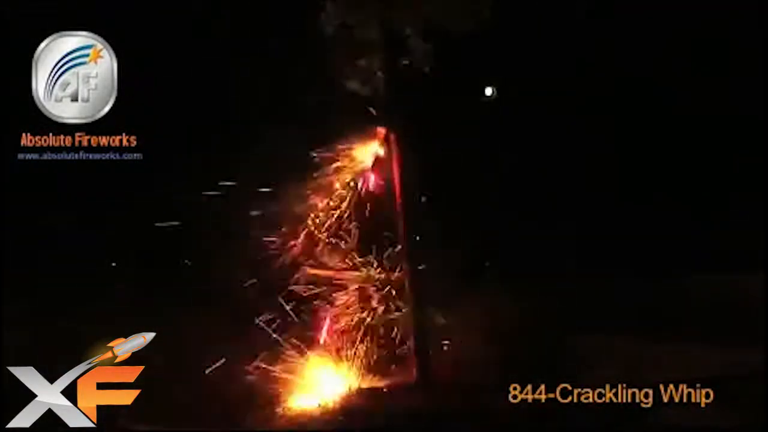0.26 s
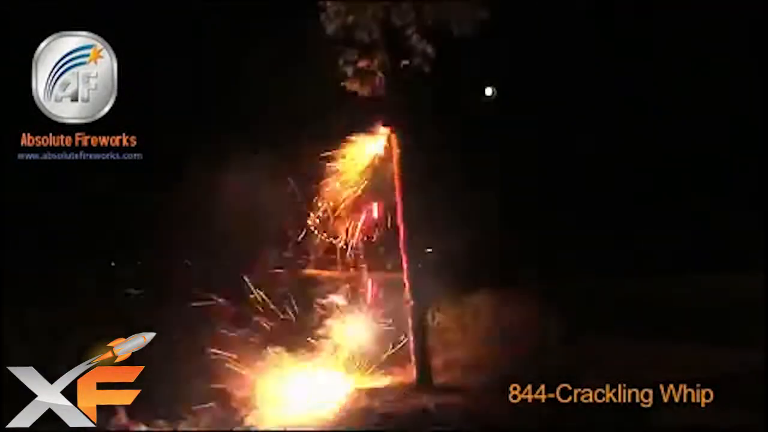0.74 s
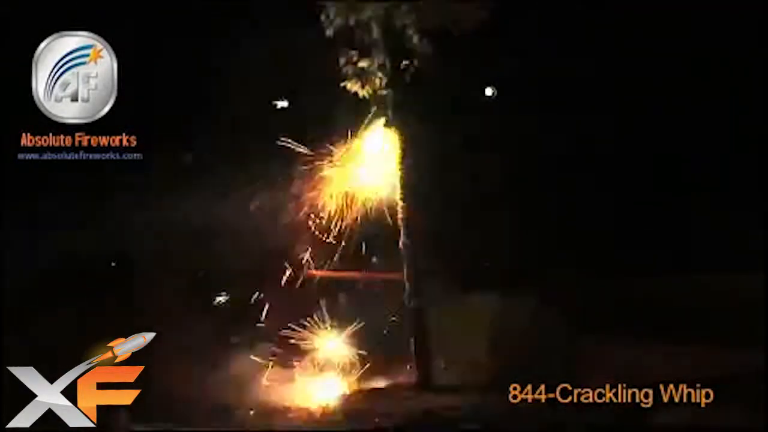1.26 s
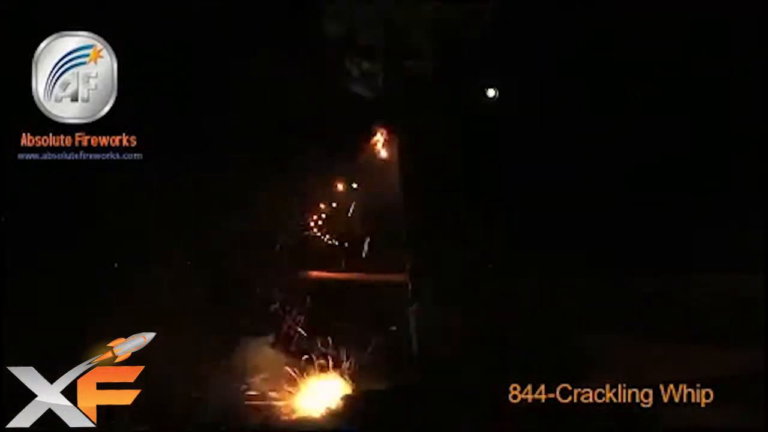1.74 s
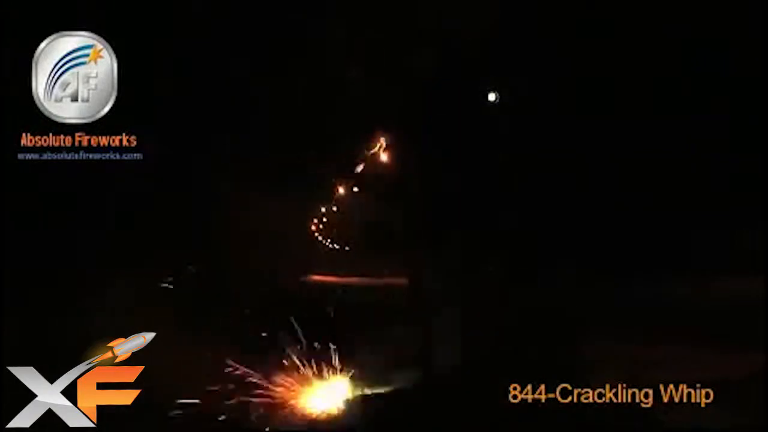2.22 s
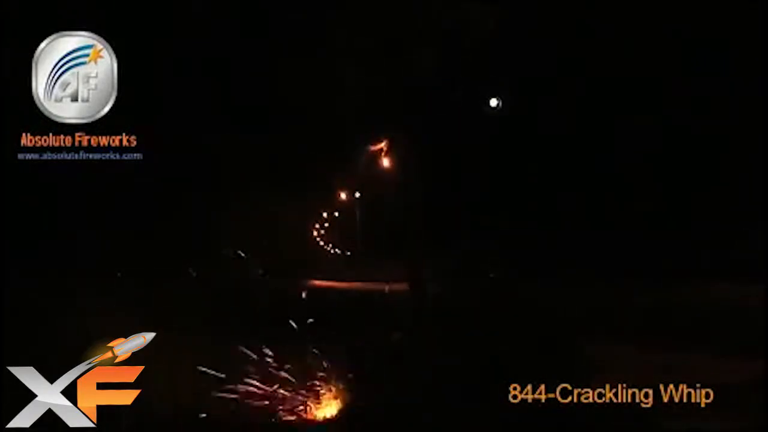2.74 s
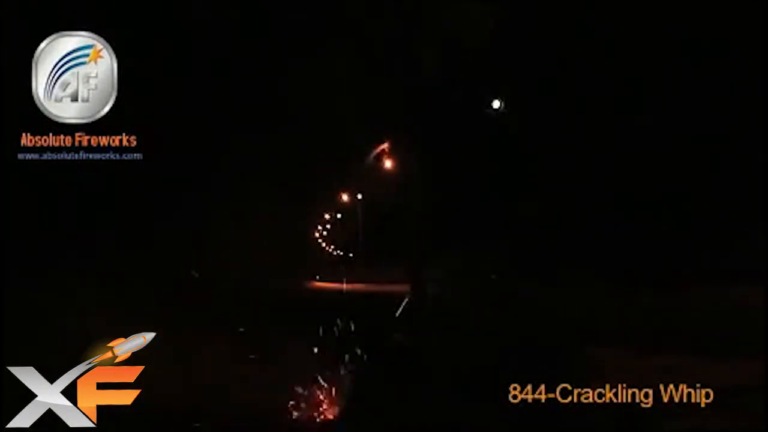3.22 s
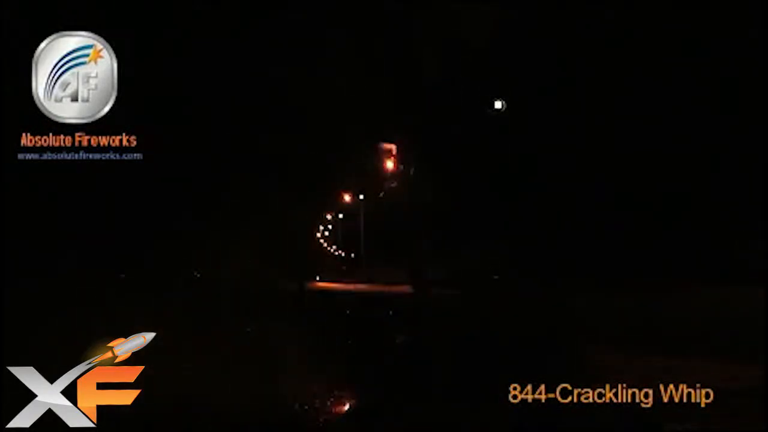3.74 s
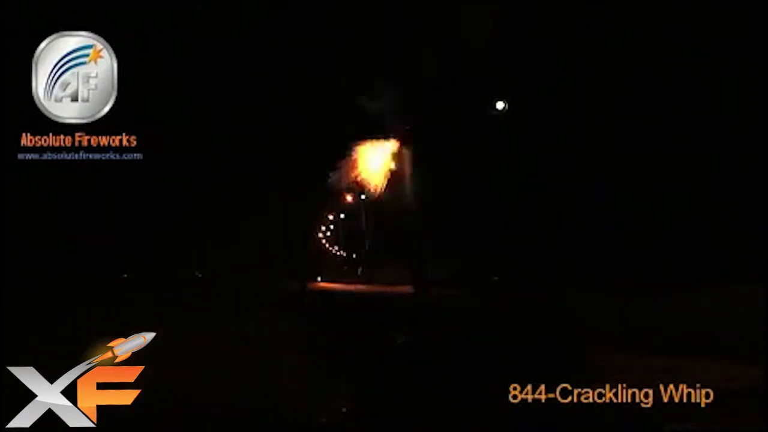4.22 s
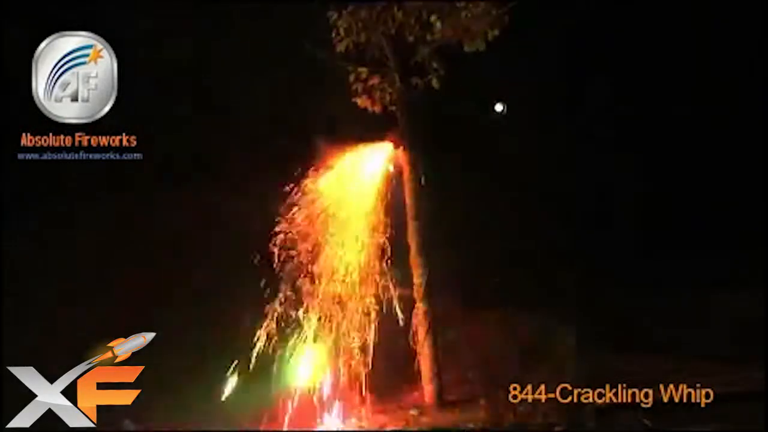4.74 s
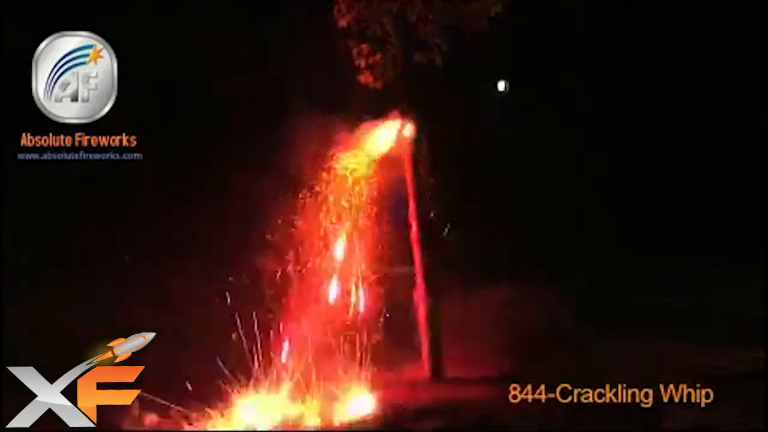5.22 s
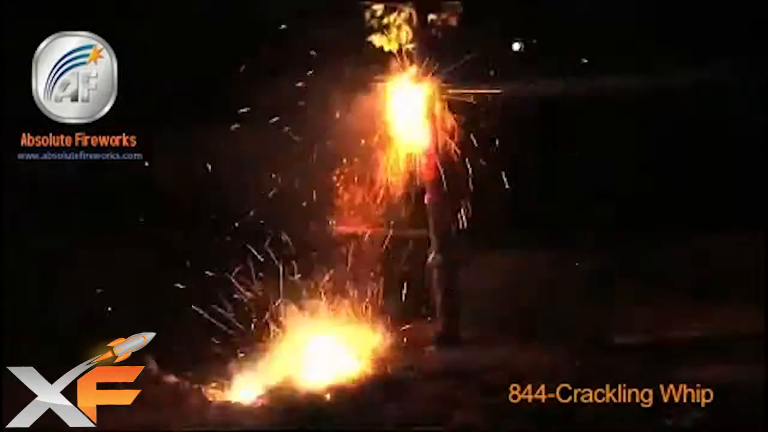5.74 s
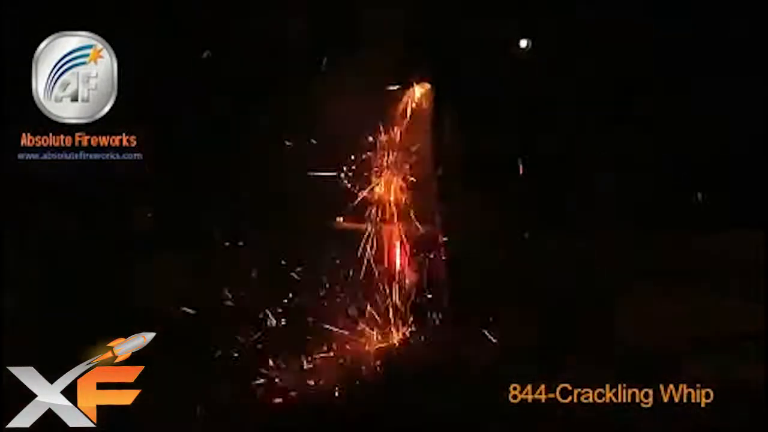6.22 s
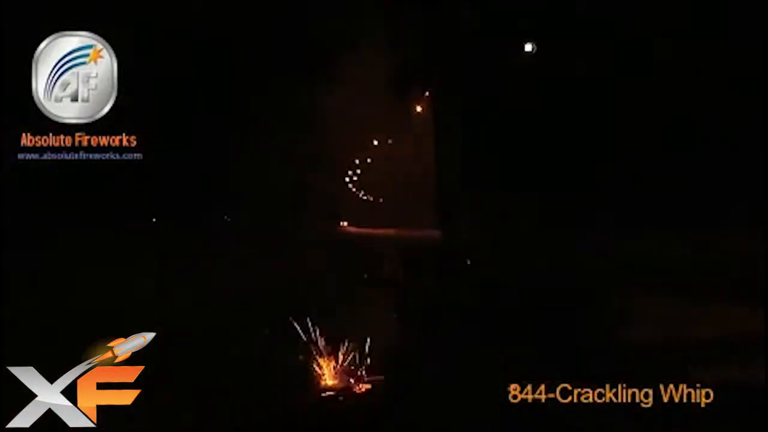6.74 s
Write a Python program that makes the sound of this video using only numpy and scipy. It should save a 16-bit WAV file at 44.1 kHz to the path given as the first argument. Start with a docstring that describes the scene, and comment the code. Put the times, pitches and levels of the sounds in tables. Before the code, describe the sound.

Sharp, uneven bangs and pops from burning pellets come many per second, each with a ground slap, scattered close reflections and a diffuse tail from nearby walls. They become sparse, then stop. After a quiet gap comes a brief bright fizz and a rushing gas jet, followed by a frantic crackling volley with sizzling sparks and low rumble, ending in a few last snaps. Open street, fairly near microphone.

```python
"""A crackling firework hangs from a tree at night; its pellets burst in the air and on the pavement.
Each crack is a short pressure pulse with a ground bounce and a cluster of noisy near reflections.
Tiny sparks fizz, the street answers with shaped noise, and a low rumble swells over a faint outdoor hush.
The crackle thins out, a fuse fizzes, and a fresh charge catches with puffs and a hiss of filtered noise.
A last dense volley then dies away."""
import sys
import numpy as np
from scipy import signal
from scipy.fft import rfft, irfft, next_fast_len
from scipy.io import wavfile
from scipy.ndimage import map_coordinates

SR = 44100
rng = np.random.default_rng(int(sys.argv[2]) if len(sys.argv) > 2 else 0)


def master(y):
    """Save y as 16-bit WAV."""
    cut = np.clip(np.atleast_2d(y).T, -1, 1)
    pcm = np.round(cut * 32767)  # scale
    wavfile.write(sys.argv[1], SR, pcm.astype(np.int16))


N = 307818
TOP_HZ = 10380
WINDOW = 4096  # samples that hold one crack and its near reflections


def amp(db):
    """Turn decibels into a plain gain."""
    return 10 ** (np.asarray(db) / 20)


def unit(x):
    """Scale a sound to an rms of 1."""
    return x / np.sqrt(np.mean(x ** 2) + 1e-20)


def colour(points, hz):
    """Gain at each frequency, drawn through (Hz, dB) points on a log axis."""
    point_hz, point_db = np.transpose(points)
    return amp(np.interp(np.log(hz + 1), np.log(point_hz), point_db))


def curve(rows):
    """Gain per sample through (s, dB) rows, fading out fast beyond their ends."""
    row_s, row_db = np.transpose(rows)
    t = np.arange(N) / SR
    outside_s = np.abs(t - np.clip(t, row_s[0], row_s[-1]))
    return amp(np.interp(t, row_s, row_db) - 670 * outside_s)


def wobble(rate):
    """A smooth random curve with rate knots a second."""
    knots = rng.standard_normal(int(N * rate / SR) + 4)
    return map_coordinates(knots, [np.arange(N) * rate / SR])


def filtered(x, response):
    """Filter x by a complex response of frequency."""
    size = next_fast_len(N + SR // 2)  # spare room so that nothing wraps round
    return irfft(rfft(x, size) * response(np.fft.rfftfreq(size, 1 / SR)), size)[..., :N]


def band(hz):
    return 1 / np.sqrt(1 + (hz / TOP_HZ) ** 160)


def rush(response, width):
    """Coloured stereo noise of rms 1; width is the side over the mid signal."""
    mid, side = filtered(rng.standard_normal((2, N)), lambda hz: response(hz) * band(hz))
    return unit(np.array([mid + width * side, mid - width * side]))


def delay(hz, seconds):
    """A pure time delay, as a response of frequency."""
    return np.exp(-2j * np.pi * hz * seconds)


def blast(hz, pitch_hz, turn_hz=3300):
    """One pressure spike and its suction; the microphone's phase lag folds it into an N shape."""
    s = 1j * hz / pitch_hz
    pulse = s / (1 + s) ** 2
    phase_lag = (turn_hz - 1j * hz) / (turn_hz + 1j * hz)
    return pulse * phase_lag * band(hz)


# level of the swarm of tiny sparks over time: start_s, level_db
SPARK_LEVELS = [(0, -33.5), (.5, -53), (2.2, -38), (2.45, -64), (5.12, -59), (5.29, -30), (5.62, -27),
                (5.97, -29.5), (6.25, -40), (6.5, -93)]


def sparks(rate_per_s=350, pitch_hz=2300, size_spread_db=4):
    """Countless tiny bursts of uneven size over the wash of their own reflections."""
    sizes = (rng.random(N) < rate_per_s / SR) * amp(size_spread_db * np.clip(rng.standard_normal(N), -2, 2))
    left_right = sizes * amp(2 * rng.standard_normal((2, N)))
    ticks = unit(filtered(left_right, lambda hz: blast(hz, pitch_hz) * colour(CRACK_TONE, hz)))
    wash = rush(lambda hz: np.abs(blast(hz, pitch_hz)) * colour(REFLECTION_TONE, hz), width=0.92)
    wash *= amp(1.1 * wobble(37))
    return curve(SPARK_LEVELS) * unit(ticks + wash)


# level of the low rumble, strongest while the flames are high: start_s, level_db
RUMBLE_LEVELS = [(0, -54), (2.6, -59), (3.8, -70), (4.27, -54), (4.6, -73), (5.7, -45), (6.6, -68)]


def flame_rumble(swing_db=3.5):
    """An uneven low rumble of the flames, made from deep noise."""
    rumble = rush(lambda hz: 1 / (1 + (hz / 140) ** 3), width=0.66)
    return curve(RUMBLE_LEVELS) * amp(swing_db * wobble(12)) * rumble


# tone of the outdoor hush: pitch_hz, relative_db
HUSH_TONE = [(90, 0.5), (250, -12), (2500, -30), (10000, -11.5)]


def night_hush(hush_db=-64):
    """A faint, steady outdoor hush of noise."""
    return amp(hush_db) * rush(lambda hz: colour(HUSH_TONE, hz), width=0.94)


def ripple(depth_db, grain_hz):
    """A causal filter with random humps and notches about grain_hz apart."""
    hz = np.fft.rfftfreq(WINDOW, 1 / SR)
    db = depth_db * map_coordinates(rng.standard_normal(WINDOW // 8), [hz / grain_hz], mode="mirror")
    # folding the cepstrum forward in time keeps the response from starting early
    cepstrum = irfft(np.log(amp(db)))
    return np.exp(rfft(cepstrum * 2 * (np.arange(WINDOW) < WINDOW // 2)))


def bass_lag(hz, corner_hz=190, damping=1.0):
    """The microphone's low resonance lets the thump trail the crack by a few milliseconds."""
    s = 1j * hz / corner_hz
    return (1 - damping * s + s ** 2) / (1 + damping * s + s ** 2)


# near reflections: dB against the crack at the reference pitch, and dB more for each octave brighter
SCATTER_DB, SCATTER_DB_PER_OCTAVE, SCATTER_REFERENCE_HZ = -14.5, 2.5, 1460


def scattered_db(db, pitch_hz):
    """Bright bursts in the air scatter more than dull ones on the pavement."""
    return db + SCATTER_DB + SCATTER_DB_PER_OCTAVE * np.log2(pitch_hz / SCATTER_REFERENCE_HZ)


# tone of the crack itself: pitch_hz, relative_db
CRACK_TONE = [(50, 5.5), (260, 5), (500, 1.5), (800, 0.5), (1500, 2), (4000, -1.5), (10000, -6)]


def direct_crack(hz, lead, db, pitch_hz, front=7.6):
    """A burst shell sends out a pressure pulse, followed by its reflection from the ground."""
    # no two shells tear open alike, so each has its own colour
    shell = ripple(depth_db=3, grain_hz=650) * bass_lag(hz) * delay(hz, lead / SR)
    # a slow, deep burst also has a softer pressure front
    wave = blast(hz, pitch_hz) * shell / (1 + 1j * hz / (front * pitch_hz))
    # the bounce lags by the height of the burst and is stronger on the right
    bounce = np.array([[0.225], [0.54]])
    ground = bounce * delay(hz, rng.uniform(0.000868, 0.00249)) / (1 + 1j * hz / 5000)
    direct = irfft(wave * colour(CRACK_TONE, hz) * (1 - ground))
    # equal energy to a steady sound of this level lasting 2.1 ms
    direct *= amp(db) * np.sqrt(0.0021 * SR / np.sum(direct.mean(0) ** 2))
    # a small random tilt between left and right, in dB
    return direct * amp(rng.normal(0, 0.23) * np.array([[1], [-1]]))


# tone of the near reflections: pitch_hz, relative_db
REFLECTION_TONE = [(120, 1), (290, 18), (700, 5.5), (2500, 1.5), (10000, 4.5)]


def near_reflections(hz, lead, db, pitch_hz, lumpy_db=3, spread_s=0.015, width=0.57, wide_hz=4500,
                     scatter_hz=1900, memory=0.48):
    """Things nearby return a dense cluster of echoes, made from noise that swells and dies."""
    t = np.arange(WINDOW) / SR
    cluster = np.sqrt((1 - np.exp(-t / 0.00067)) / (1 + (t / spread_s) ** 5))
    # reflections of uneven strength
    knots_s = t[::WINDOW // 128]
    lumps = amp(lumpy_db * np.interp(t, knots_s, rng.standard_normal(len(knots_s))))
    # a few hard surfaces return separate snaps, about 300 a second
    snaps = 1 + 4 * (rng.random(WINDOW) < 300 / SR)
    mid, side = rfft(rng.standard_normal((2, WINDOW)) * cluster * lumps * snaps)
    # the two sides agree less in the treble
    side = side * width * (0.7 + hz / (hz + wide_hz))
    # they mix what left the burst in all directions, and keep only part of its pitch
    mixed_hz = scatter_hz * (pitch_hz / scatter_hz) ** memory
    mixed = blast(hz, mixed_hz) * delay(hz, lead / SR) * colour(REFLECTION_TONE, hz)
    paths = ripple(depth_db=2.8, grain_hz=170)
    near = irfft(np.array([mid + side, mid - side]) * mixed * paths)
    loudness = np.sqrt(np.sum(cluster ** 2) / np.sum(near.mean(0) ** 2))
    return near * amp(scattered_db(db, pitch_hz)) * loudness


# single bursts, loud and faint, and one low thump: start_s, level_db, pitch_hz
SINGLE_BURSTS = [(0.0774, -16.5, 2600), (0.1494, -15.5, 2800), (0.2129, -14, 1850), (0.2353, -18.5, 1790),
                 (0.2619, -18, 2150), (0.2987, -14.5, 1420), (0.3259, -16.5, 920), (0.4147, -15, 1030),
                 (0.433, -18.5, 1900), (0.4775, -18, 1700), (0.5251, -16.5, 694), (0.5521, -18, 2110),
                 (0.5765, -17, 1360), (0.6202, -17, 1440), (0.6418, -17.5, 1370), (0.6638, -19.5, 2300),
                 (0.7039, -16.5, 3040), (0.7453, -15.0, 2010), (0.776, -19, 2810), (0.7933, -12, 1020),
                 (0.8324, -14.5, 1270), (0.9309, -20, 1240), (0.9456, -17.5, 980), (0.9979, -15, 1140),
                 (1.0194, -14.5, 1470), (1.05, -13.5, 1020), (1.1065, -15.5, 1610), (1.1394, -17.5, 2460),
                 (1.1717, -13.5, 1050), (1.2134, -16.5, 1070), (1.2527, -19, 880), (1.323, -13, 1350),
                 (1.342, -18.5, 2100), (1.381, -14, 1700), (1.4138, -14.5, 1520), (1.4708, -17.5, 1610),
                 (1.486, -13.5, 1520), (1.5359, -18, 1560), (1.5622, -17, 980), (1.5912, -13, 1190),
                 (1.6657, -18.0, 1530), (1.68, -14, 1200), (1.71, -18.5, 910), (1.7675, -18, 990),
                 (1.8096, -14.5, 1280), (1.8447, -18, 930), (1.8638, -13.5, 1000), (1.9117, -17, 1160),
                 (1.9643, -15, 2730), (2.0261, -14.0, 1500), (2.0435, -14.5, 1220), (2.1282, -17, 1060),
                 (2.1741, -13.5, 1480), (2.2057, -18, 990), (2.261, -20.5, 1120), (2.2749, -16, 1270),
                 (2.3148, -25, 1110), (2.468, -24, 915), (2.5044, -11, 1510), (2.5586, -17, 1270),
                 (2.6002, -13, 780), (2.6287, -17.5, 1030), (2.6997, -22, 800), (2.7329, -17.5, 860),
                 (2.7675, -16, 1250), (2.8687, -17.5, 1260), (2.888, -17, 2200), (2.9315, -12.5, 1520),
                 (2.968, -12.5, 1370), (3.005, -13.5, 1290), (3.2139, -13.5, 1250), (3.2444, -19.5, 795),
                 (3.582, -12.5, 1683), (3.6391, -13.5, 1740), (4.2524, -33.5, 520), (5.0099, -32.5, 2130),
                 (5.1668, -14, 1520), (5.2057, -15.5, 1680), (5.2361, -18.5, 1920), (5.2913, -15.5, 2390),
                 (5.3351, -16.5, 1410), (5.3472, -11.5, 1860), (5.3855, -16.5, 1460), (5.4624, -15, 990),
                 (5.5165, -15.5, 1650), (5.5567, -14.5, 2690), (5.5911, -15, 2400), (5.6639, -20.5, 2000),
                 (5.7024, -14.5, 1720), (5.739, -13, 2250), (5.8366, -19.5, 1950), (5.907, -17, 2140),
                 (5.925, -13.5, 1290), (5.9401, -15.5, 1270), (5.9626, -14, 1650), (6.0986, -11.5, 1680),
                 (6.1096, -14.5, 1680), (6.1372, -15, 980), (6.1862, -13.5, 1330), (6.2093, -16, 1180),
                 (6.2592, -15, 1790), (6.3577, -16, 2050), (6.4015, -14, 1190), (6.4376, -24.5, 810),
                 (6.467, -32.5, 466), (6.587, -12.5, 1410), (6.6562, -32, 690), (6.753, -27.5, 3800),
                 (6.7903, -21.5, 3000)]


def cracks(rows):
    """Each burst gives a blast, a ground bounce and its own cluster of near reflections."""
    out = np.zeros((2, N + 2 * WINDOW))
    hz = np.fft.rfftfreq(WINDOW, 1 / SR)
    lead = WINDOW // 64  # samples of room before each burst
    for start_s, db, pitch_hz in rows:
        crack = direct_crack(hz, lead, db, pitch_hz) + near_reflections(hz, lead, db, pitch_hz)
        first = round(start_s * SR)
        out[:, first:first + WINDOW] += crack
    return out[:, lead:lead + N]


# while the first charge sputters, each single burst sets off a neighbour shortly after, weaker on average;
# the lag is drawn between half and twice the value given
SPUTTER_END_S, NEIGHBOUR_LAG_S, NEIGHBOUR_DB, NEIGHBOUR_HZ = 2.25, 0.011, -6.5, 1270
# the last volley: more pellets bursting at random moments
VOLLEY_START_S, VOLLEY_END_S, VOLLEY_PER_S, VOLLEY_DB, VOLLEY_HZ = 5.29, 6.06, 60, -19.5, 1790
# how far these added pellets differ from one another, either way
PELLET_SPREAD_DB, PELLET_SPREAD_OCTAVES = 3, 1.1


def added_pellets():
    """More (s, dB, Hz) bursts: neighbours set off by the early ones, then the random volley."""
    leaders = [(s, db) for s, db, _ in SINGLE_BURSTS if s < SPUTTER_END_S]
    lags = NEIGHBOUR_LAG_S * (0.5 + 1.5 * rng.random(len(leaders)))
    rows = [(s + lag, db + NEIGHBOUR_DB, NEIGHBOUR_HZ) for (s, db), lag in zip(leaders, lags)]
    volley_count = int(VOLLEY_PER_S * (VOLLEY_END_S - VOLLEY_START_S))
    moments = rng.uniform(VOLLEY_START_S, VOLLEY_END_S, volley_count)
    rows += [(s, VOLLEY_DB, VOLLEY_HZ) for s in moments]
    chance = 2 * rng.random((len(rows), 2)) - 1
    return [(s, db + PELLET_SPREAD_DB * strength, hz * 2 ** (PELLET_SPREAD_OCTAVES * tone))
            for (s, db, hz), (strength, tone) in zip(rows, chance)]


# tone of the street's long answer: pitch_hz, relative_db
STREET_TONE = [(100, -9), (400, 1.5), (1200, -1), (2600, -1.5), (5000, -3.5), (10000, -15.5)]
# narrow rings in that answer: pitch_hz, width_hz, level_db (against the diffuse sound)
STREET_RINGS = [(2300, 120, -8), (2830, 40, -10)]


def street_rings(hz):
    """Gain that lets a few narrow resonances stand out of the diffuse sound."""
    return 1 + sum(amp(db) / (1 + (2 * (hz - centre) / wide) ** 2) for centre, wide, db in STREET_RINGS)


def street(tail_db=-22, echo_db=-11.0, echo_s=0.0463, echo_length_s=0.0055):
    """A bright echo from the tree and walls, then the long diffuse answer of the street."""
    power, t = np.zeros(N), np.arange(SR) / SR
    for start_s, db, pitch_hz in SINGLE_BURSTS:
        power[round(start_s * SR)] += amp(scattered_db(db, pitch_hz)) ** 2

    def heard(shape):
        """Answers to all the single bursts overlap, and their powers add."""
        return np.sqrt(np.abs(signal.fftconvolve(power, shape ** 2)[:N]))

    # the answer holds, then falls away once the farthest house fronts have replied
    tail = heard(amp(tail_db) * (1 - np.exp(-t / 0.005)) / np.sqrt(1 + (t / 0.21) ** 8))
    echo = heard(amp(echo_db) * np.exp(-0.5 * ((t - echo_s) / echo_length_s) ** 2))
    diffuse = rush(lambda hz: colour(STREET_TONE, hz) * street_rings(hz), width=0.57)
    diffuse *= tail * amp(1.74 * wobble(84))
    return diffuse + echo * rush(lambda hz: np.abs(blast(hz, 2800)), width=0.82)


FUSE_START_S, FUSE_END_S, FUSE_DB, FUSE_HZ = 4.09, 4.3, -46.5, 5030


def fuse():
    """A short bright fizz of noise that swells and burns out as the fresh charge catches."""
    burnt = np.clip((np.arange(N) / SR - FUSE_START_S) / (FUSE_END_S - FUSE_START_S), 0, 1)
    fizz = rush(lambda hz: np.abs(blast(hz, FUSE_HZ)), width=0.47)
    return amp(FUSE_DB) * np.sin(np.pi * burnt) * fizz


# the jet of burning gas: lights, swells, sags slowly, then dies
JET_START_S, JET_ATTACK_S, JET_END_S = 4.14, 0.21, 4.95
JET_DB, JET_SAG_DB_PER_S, JET_RELEASE_DB_PER_S = -44.5, 7.5, 56


def jet_flow():
    """Gain per sample of the jet: a rise, a sagging hold and a quick release."""
    t = np.arange(N) / SR
    age = np.maximum(t - JET_START_S, 0)
    fall_db = JET_SAG_DB_PER_S * age + JET_RELEASE_DB_PER_S * np.maximum(t - JET_END_S, 0)
    return np.minimum(age / JET_ATTACK_S, 1) * amp(JET_DB - fall_db)


# soft puffs as the charge catches: start_s, level_db (at the peak), length_s (peak at half of it)
CATCHING_PUFFS = [(4.211, -38.5, 0.022), (4.247, -35, 0.013)]
# tone of the jet's hiss, before the ground combs it: pitch_hz, relative_db
HISS_TONE = [(60, -16), (220, -4.5), (380, -0.5), (600, -1.5), (1300, -3), (1600, -5.5), (3500, -6.5),
             (10000, -9.5)]
# tone of the puffs: pitch_hz, relative_db
PUFF_TONE = [(60, -17), (700, -3), (1500, -18), (9000, -23.5)]


def jet(ground=0.44, ground_lag_s=0.00234):
    """The fresh charge catches in puffs and hisses; the ground's reflection combs the hiss."""
    def comb(hz):
        """The hiss plus a duller, delayed copy of itself."""
        return 1 + ground / (1 + (hz / 3000) ** 2) * delay(hz, ground_lag_s)

    hiss = rush(lambda hz: colour(HISS_TONE, hz) * comb(hz), width=0.47)
    hiss *= amp(1.8 * wobble(35)) * jet_flow()
    swell = np.zeros(N)
    for start_s, db, length_s in CATCHING_PUFFS:
        age = np.maximum(np.arange(N) / SR - start_s, 0) / length_s * 2
        swell += amp(db) * age * np.exp(1 - age)
    return hiss + swell * rush(lambda hz: colour(PUFF_TONE, hz), width=0.62)


# humps and notches on the way to the microphone: pitch_hz, width_hz, gain_db
PATH_HUMPS = [(843, 230, -1), (1215, 73, 1), (2140, 90, -2.5), (2550, 183, 2), (3833, 105, -5.5),
              (4000, 190, 1.5), (6150, 390, 0.5), (6520, 500, 2.5)]
# stereo balance of the whole firework: pitch_hz, left_minus_right_db
STEREO_BALANCE = [(30, -7), (125, -11.5), (500, -3), (1000, -5), (2000, -2.5), (4000, -5), (8000, -2.5)]


def path(hz):
    """Gain from the firework to each microphone: a fixed colour, leaning to the right."""
    humps_db = sum(db * np.exp(-2 * ((hz - centre) / wide) ** 2) for centre, wide, db in PATH_HUMPS)
    return amp(humps_db) * colour(STEREO_BALANCE, hz) ** np.array([[0.5], [-0.5]])


def scene():
    """Cracks and sparks, the street's answer, the fuse and the jet, over the rumble and the hush."""
    bursts = cracks(list(SINGLE_BURSTS) + added_pellets())
    firework = sparks() + bursts + street() + fuse() + jet()
    return filtered(firework, path) + flame_rumble() + night_hush()


def record(dry):
    """Round off the tallest peaks smoothly and keep nothing above the band limit."""
    rounded = dry / (1 + np.abs(dry / 0.85) ** 4) ** (1 / 4)
    return filtered(rounded, band)


dry = scene()
out = record(dry)
master(out)
```